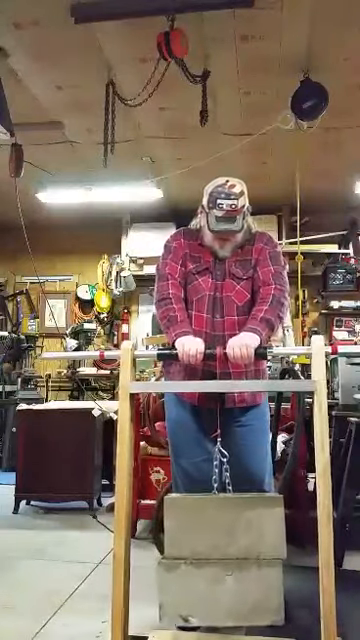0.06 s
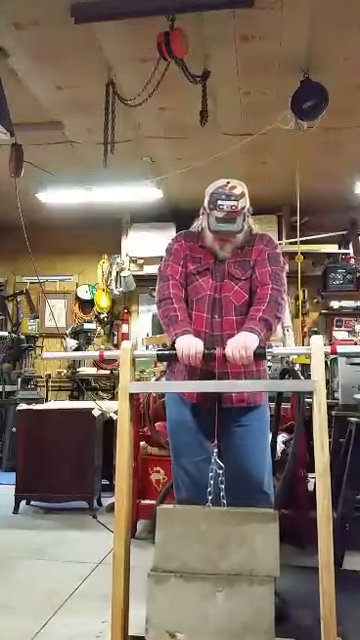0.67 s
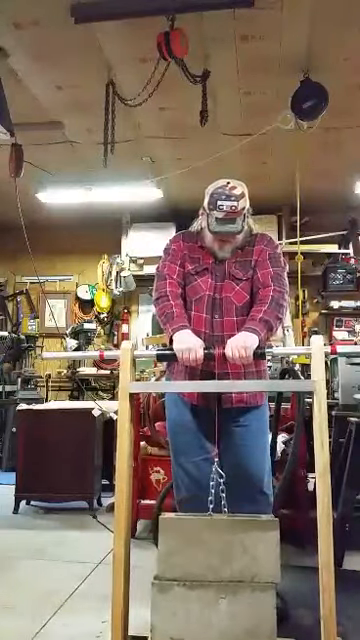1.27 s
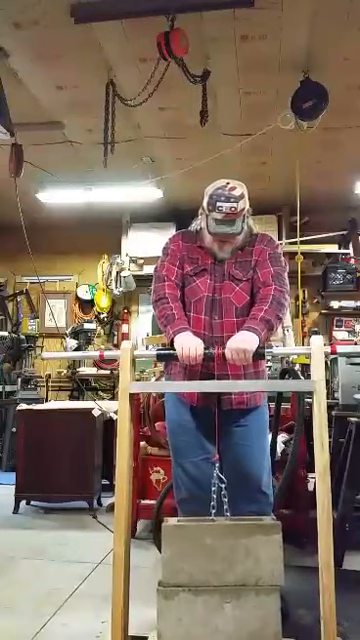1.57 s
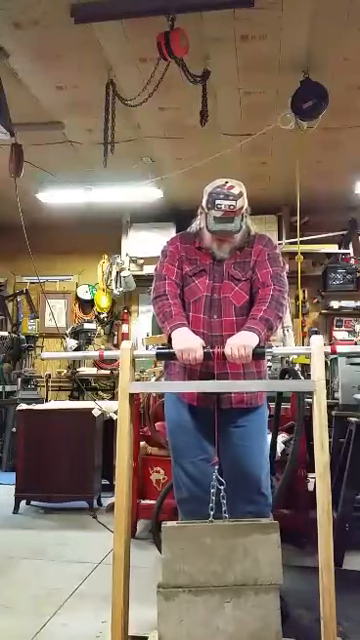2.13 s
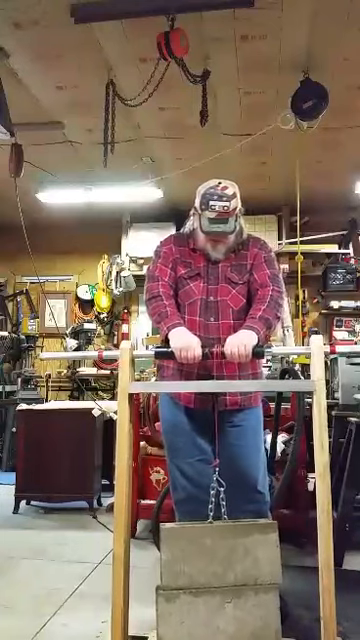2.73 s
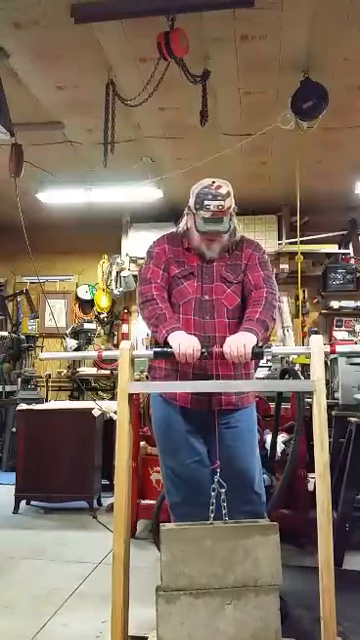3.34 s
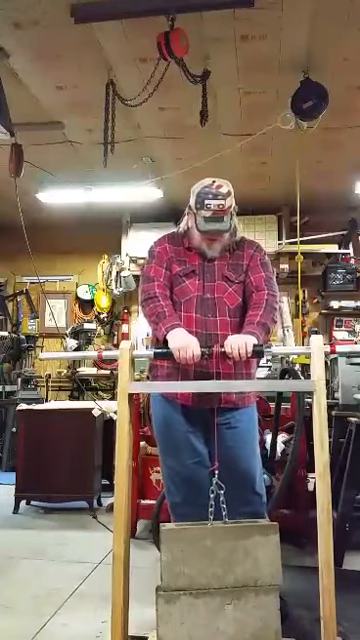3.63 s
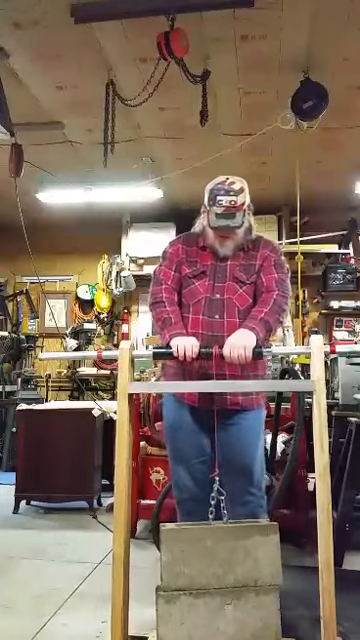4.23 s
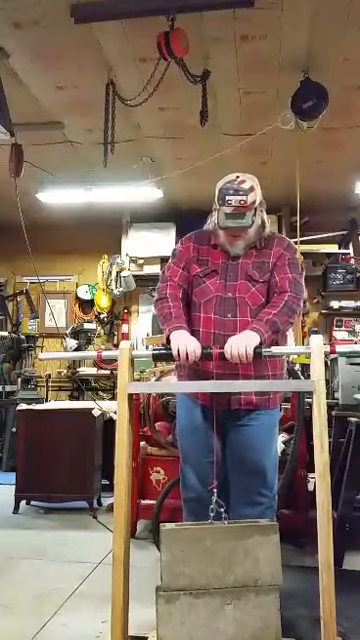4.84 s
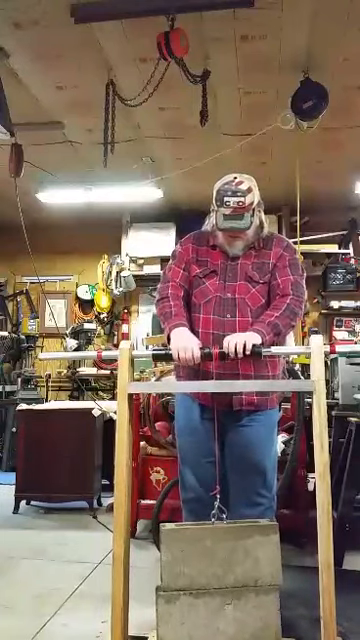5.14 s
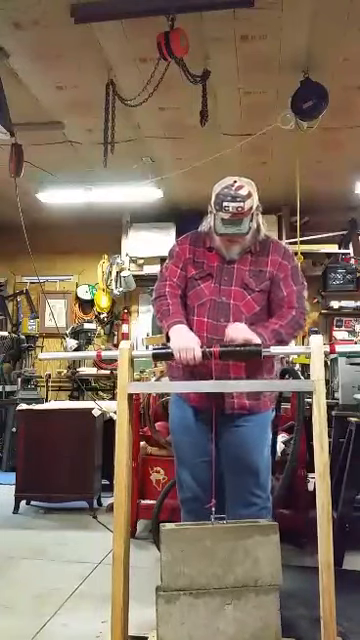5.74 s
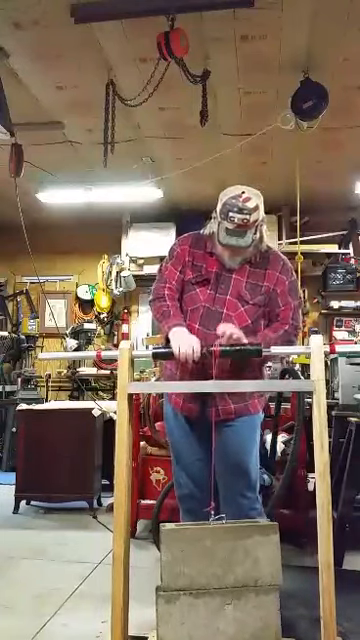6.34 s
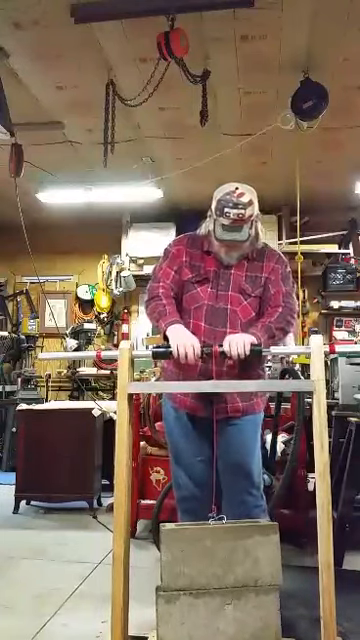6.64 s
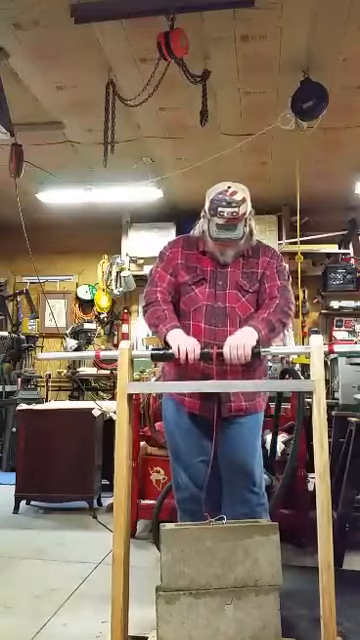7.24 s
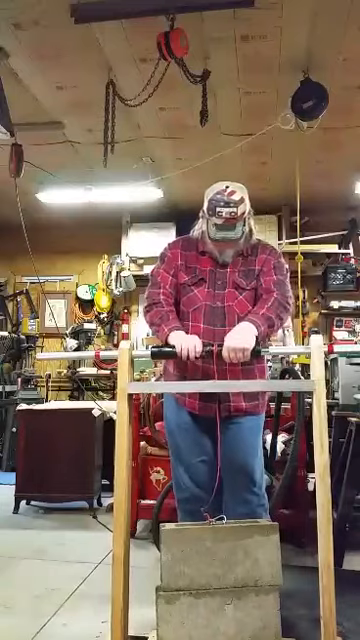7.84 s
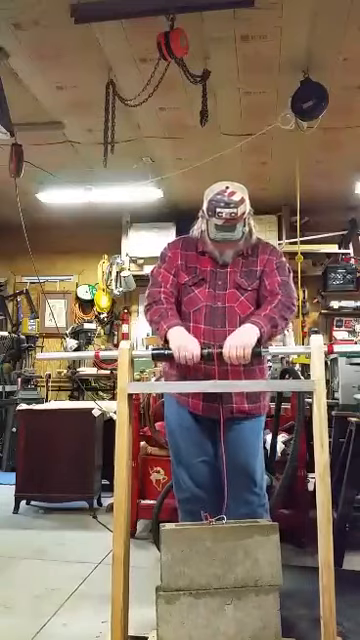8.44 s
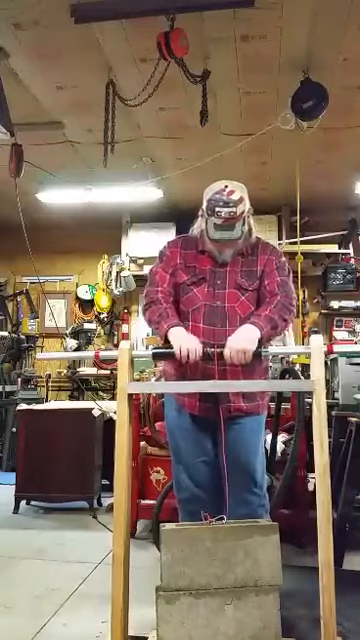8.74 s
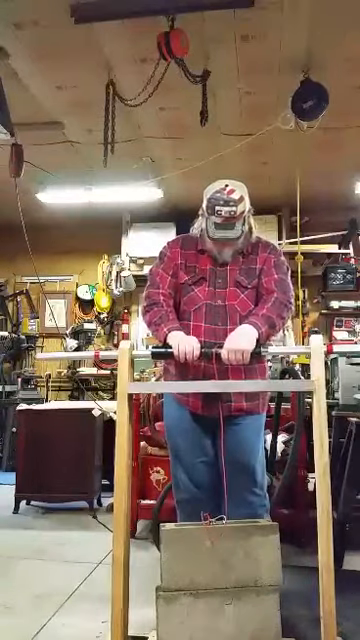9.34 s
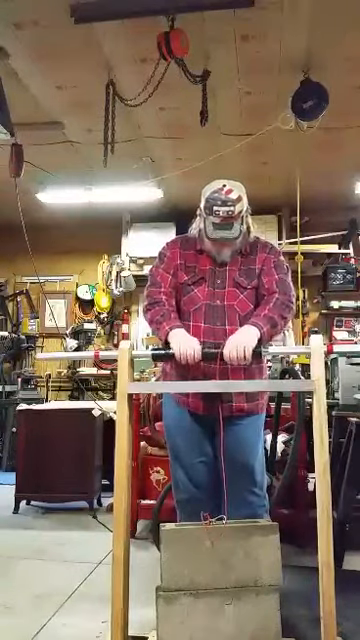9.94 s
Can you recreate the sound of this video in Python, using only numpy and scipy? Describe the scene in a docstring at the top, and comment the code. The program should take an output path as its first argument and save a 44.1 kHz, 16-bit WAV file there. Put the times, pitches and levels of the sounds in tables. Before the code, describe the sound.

A bar twists in short rumbling strokes in wood, a chain clinks, the bar knocks, then slipping cord clicks and thumps the frame.

```python
"""A low wooden rumble and a few judders, close by: a homemade wrist roller turning in a workshop.
Each twist of the steel bar rumbles through the wooden uprights and pays out cord, until the concrete
blocks land with a thump and their chain slackens, clinking. Later the cord slips with a click and the
jerk thumps the frame. Midway the bar slides and clacks in its holes and a palm brushes the grip.
The microphone stands low and close, with the frame a little to its right and the room behind."""
import sys
import numpy as np
from scipy import signal
from scipy.fft import rfft, irfft, next_fast_len
from scipy.io import wavfile
from scipy.ndimage import uniform_filter1d, map_coordinates

SR = 44100
rng = np.random.default_rng(int(sys.argv[2]) if len(sys.argv) > 2 else 0)


def wrap_up_sound(samples):
    """Save the sound to the file named by the first command line argument, as 16-bit audio."""
    columns = np.atleast_2d(samples).T
    # keep every value between -1 and 1, then stretch to whole-number steps
    tamed = np.clip(columns, -1, 1)
    steps = np.round(tamed * 32767).astype(np.int16)
    wavfile.write(sys.argv[1], SR, steps)


N = 441000

# twists of the bar: (time of top speed [s], length [s], rumble level [dB], cord rub level [dB])
TWISTS = [(0.008, 0.15, -59.5, -70.5), (0.354, 0.16, -45, -79), (0.72, 0.2, -46, -73),
          (1.009, 0.16, -45, -68), (1.129, 0.11, -55, -69), (1.47, 0.098, -45.5, -71),
          (1.771, 0.17, -42, -73), (2.388, 0.13, -52, -83), (2.745, 0.63, -51, -64),
          (3.163, 0.2, -57.5, -72), (3.886, .3, -51.5, -62), (4.243, 0.15, -49.5, -56.5),
          (5.252, 0.17, -44, -61.5), (6.497, 0.15, -40.5, -55.5), (6.853, 0.24, -43, -60),
          (7.097, 0.11, -36.5, -59.5), (7.357, 0.14, -37, -59.5), (7.605, 0.15, -40.5, -59),
          (7.863, 0.14, -37.5, -57), (8.117, 0.14, -37.5, -58.5), (8.325, 0.087, -35, -53),
          (8.638, 0.31, -43.5, -57), (9.07, 0.3, -56.5, -71), (9.286, 0.31, -53.5, -65.5),
          (9.573, 0.18, -49, -65), (9.723, 0.15, -53, -73.5), (9.913, 0.14, -55.5, -71.5)]
# spectra of the uprights, the rubbing cord and its fibres: (frequency [Hz], level [dB])
RUMBLE_SPECTRUM = [(60, -48), (125, -6), (160, -5.5), (205, -0.5), (250, 3), (305, 5.5), (365, -5.5),
                   (430, -15.5), (550, -7), (680, -13.5), (840, -13), (1100, -30), (1500, -31.5),
                   (3000, -94.5)]
RUB_SPECTRUM = [(600, -12.5), (1200, 3), (1700, -5), (2500, -0.5), (3400, -7.5), (4300, -7), (5300, -13),
                (6800, -24.5), (7900, -18), (8700, -13.5), (9800, -13), (11200, -25), (12500, -18),
                (15000, -30)]
SWISH_SPECTRUM = [(5000, -59), (7500, -19.5), (8700, 9), (10000, -1.5), (11200, -2.5), (12500, -7.5),
                  (15000, -28)]
SLACK_SWISH_DB = -29  # relative to the rumble
LANDING_S = 1.9  # by then the cord has lost the weight of the blocks

# thumps of the frame: low judders under load, the blocks landing, then cord jerks with a snap:
# (time [s], snap level [dB], boom level [dB], boom pitch [Hz])
THUMPS = [(0.326, -96, -32, 218.1), (0.361, -76, -41, 243), (0.693, -102, -36, 230),
          (1.447, -73, -33.5, 216), (1.765, -64, -13, 319), (1.798, -59, -31.5, 311),
          (2.499, -76, -37.5, 265), (2.972, -64, -30.5, 288), (3.636, -55, -23, 282),
          (3.899, -66, -36.5, 314), (6.455, -60, -35, 314), (7.002, -57.5, -33.5, 265),
          (7.292, -42.5, -40, 289.5), (7.51, -57.5, -38, 282), (7.549, -46, -42, 292),
          (7.733, -57, -57, 270), (7.986, -74, -33.5, 278.4), (8.287, -45, -23.5, 329),
          (8.389, -56.5, -29, 277.6), (8.554, -42, -26.5, 282), (8.658, -48, -22, 292),
          (9.01, -59.5, -33, 292), (9.204, -37.5, -22, 291), (9.417, -66.5, -32, 285),
          (9.516, -67, -36, 277), (9.657, -39, -18.5, 277), (9.916, -82, -39.5, 292)]
# modes of the wooden frame, main bending mode first: (frequency [Hz], level [dB], t60 [s])
FRAME_MODES = [(292, 8.5, 0.068), (196.3, -10, .1), (354, -4.5, 0.098), (583.4, -9, 0.056),
               (784.4, -21.5, 0.094), (145.2, -11.5, 0.062)]
BOOM_LAG_S, BOOM_RISE_S = 0.00333, 0.0052  # the frame answers just after the snap
# spectrum of a bare contact: (frequency [Hz], level [dB])
CONTACT_SPECTRUM = [(300, 0.5), (450, 4.5), (580, -3), (760, 7), (930, -6), (1110, -2.5), (1550, -7.5),
                    (2200, 7.5), (3100, 6), (4100, -5), (4800, -2.5), (7000, -17), (8600, -9.5),
                    (12500, -21), (15500, -28)]
# modes of the wound bar, plucked by the cord: (frequency [Hz], width [Hz], level [dB])
SPOOL_MODES = [(1063, 16, -0.5), (1425.5, 90.1, 8), (2100, 52, -2), (2400, 62, 10), (2790, 26, -5.5),
               (3013, 28, -3.5), (3700, 27, -8), (4167, 58, 9.5)]
# bounds of the body, middle, metal and top registers: (frequency [Hz])
REGISTER_EDGES = [420, 1650, 3500, 7200, 15000]
# colour of a snap at SNAP_TYPICAL_DB, by register: (level [dB])
SNAP_COLOUR = [0, 0.5, -6, -9.5]
SNAP_TYPICAL_DB = -42.5
# harder snaps have less body, by register: (change [dB per dB of snap level])
SNAP_TILT = [-0.21, 0.16, -0.035, -0.022]

# chain links falling over: (time [s], level [dB], brightness [dB], length [s])
CLINKS = [(1.363, -81.5, 22.5, 0.21), (1.807, -46.5, -0.5, 0.057), (1.82, -53, -6.5, 0.063),
          (1.846, -56.5, 8.5, 0.079), (2.317, -57.5, -1, 0.2), (2.381, -47, -1, 0.072),
          (2.401, -46, 1.5, 0.096), (2.579, -50.5, 0, 0.1), (2.673, -55, 0.5, 0.12),
          (2.756, -47.5, -2, 0.043), (2.783, -52, 0.5, 0.14), (2.893, -54.5, -2.5, 0.081),
          (2.925, -59, 1, 0.22), (3.097, -48, -2.5, 0.049), (3.2, -50.5, -4.5, 0.025), (3.708, -58, 5, .11),
          (3.803, -56, 15, 0.039), (4.204, -51.5, 8.5, 0.15), (4.301, -49.5, 5.5, 0.16),
          (4.33, -38.5, 7.5, 0.077), (4.349, -40.5, 3.5, .08), (4.397, -43.5, 8.5, 0.042)]
# modes of the links: (frequency [Hz], width [Hz], level [dB])
LINK_MODES = [(718, 32, -11), (1967, 100, 5.5), (2500, 72, 3.5), (3000, 14, 1), (3165, 23, -5.5),
              (3560, 30, 6.5), (3830, 45, -3), (3930, 16, 0), (4020, 18, 8), (4230, 51, 11),
              (4670, 21, -13)]
# colour of a clink, by register: (level [dB])
CLINK_COLOUR = [1, -1, -5, -15.5]
# brighter clinks trade body for top, by register: (change [dB per dB of brightness])
CLINK_TILT = [-1.17, -0.26, 0.83, 1]

# knocks of the bar: (time [s], thud level [dB], ring level [dB], hard edge level [dB], length [s])
CLACKS = [(4.352, -37, -52, -45, 0.066), (4.642, -46.5, -54.5, -58.5, 0.035),
          (4.903, -48, -62.5, -62, 0.047), (4.952, -46, -56.5, -81, 0.1), (5.231, -57, -57, -55.5, .06),
          (5.274, -37, -38.5, -53, .06), (5.479, -44, -53.5, -50.5, 0.11), (5.528, -37, -44, -39, 0.052),
          (5.732, -31, -33, -47.5, 0.065), (5.788, -37.5, -34.5, -40, 0.11),
          (5.974, -56, -58, -54.5, 0.037), (6.176, -44, -48.5, -51.5, 0.053),
          (6.414, -45.5, -48, -49.5, 0.14)]
# modes of the steel bar on its bearings: (frequency [Hz], width [Hz], level [dB])
BAR_MODES = [(373.4, 66, 3), (585, 70, -0.5), (696, 27, -2.5), (988, 28, -3.5), (1067, 41, -3.5),
             (1237, 60, -6.5), (1427, 59, -9), (1840, 88, -1.5), (1982, 60, -7), (2182, 40, -6.5),
             (2470, 70, -21), (3080, 15, -7), (3483, 58, -13.5), (4260, 67, -18.5)]
# lengthwise pushes of the bar: (time of top speed [s], length [s], level [dB])
PUSHES = [(4.37, 0.3, -51), (4.684, 0.13, -56), (4.936, 0.15, -56.5), (5.275, 0.05, -47),
          (5.561, 0.17, -50.5), (5.862, 0.18, -45.5)]
# strokes of a palm over the grip: (time of top speed [s], length [s], level [dB])
BRUSHES = [(6.543, 0.068, -52.5), (6.701, 0.036, -60.5), (6.831, .14, -53)]
# spectrum of skin on the grip: (frequency [Hz], level [dB])
PALM_SPECTRUM = [(3000, -47), (7000, -15), (8700, -2.5), (10500, -19), (11600, -1.5), (12300, 0),
                 (13600, -6), (14400, -23), (16000, -38)]

# reflections off floor, ceiling and wall: (delay [s], gain [ratio])
ECHOES = [(0.0142, 0.43), (0.0371, 0.27), (.051, .17)]
# decay of the workshop: (frequency [Hz], t60 [s])
ROOM_DECAY = [(150, 0.2), (300, 0.3), (800, 0.23), (3000, 0.44), (6000, 0.51), (12000, 0.51)]
# spectrum of the room tone: (frequency [Hz], level [dB])
AIR_SPECTRUM = [(12, -35.5), (20, -4), (61, 0), (148, -13.5), (185, -13.5), (549, -22.5), (932, -32.5),
                (1630, -40), (1980, -39), (3000, -44), (3750, -44.5), (4430, -35.5), (6360, -60.5),
                (10500, -53.5), (15500, -53.5)]
# likeness of left and right at the microphone: (frequency [Hz], correlation [ratio])
STEREO_LIKENESS = [(100, 0.93), (300, 0.84), (600, 0.83), (1200, 0.24), (10000, 0.23)]
# balance at the microphone: (frequency [Hz], left minus right [dB])
STEREO_BALANCE = [(50, -2), (300, -3.5), (600, -3), (1100, -5), (2200, -6.5), (4000, 1.5), (8000, -1),
                  (13000, -6)]


def turning_bar():
    """Close to the microphone the bar chatters round in the wood; the cord rubs and swishes."""
    s, length, rumble_db, rub_db = np.transpose(TWISTS)
    rumble_gain = strokes(s, length, rumble_db)
    rub_gain = strokes(s, length, rub_db, shape=1.4, end_db=-9.5)
    wood = unit(echoed(coloured(grains(N, rate=700, scatter_db=1.5), RUMBLE_SPECTRUM)))
    cord = unit(echoed(coloured(grains(N, rate=4000, scatter_db=1.5), RUB_SPECTRUM)))
    fibres = unit(coloured(grains(N, rate=2500, scatter_db=2), SWISH_SPECTRUM))
    loaded = np.clip((LANDING_S - np.arange(N) / SR) / .05, 0, 1)
    swish = amp(SLACK_SWISH_DB - 3.9 * loaded) * fibres  # a taut cord swishes less
    return rumble_gain * (wood + swish) + rub_gain * cord


def frame_thumps():
    """The frame booms briefly: it judders under load, takes the blocks' landing, then the cord's jerks."""
    track, t = np.zeros(N), np.arange(SR // 3) / SR
    for s, _, db, pitch_hz in THUMPS:
        scatter_db = 2 * rng.standard_normal(len(FRAME_MODES))
        boom = 0
        for k, (hz, level_db, t60) in enumerate(FRAME_MODES):
            # the main bending mode shifts with the pull of the cord
            hz, level_db = (pitch_hz, level_db) if k == 0 else (hz, level_db + scatter_db[k])
            boom = boom + amp(level_db - 60 * t / t60) * np.sin(2 * np.pi * hz * t)
        boom *= 1 - np.exp(-(t / BOOM_RISE_S) ** 2)
        add(track, s + BOOM_LAG_S, amp(db) * boom / np.abs(boom).max())
    return echoed(np.array([track, track]))


def cord_slips():
    """The cord snaps over its own turns and plucks the bar, barely audible in the early thumps."""
    track = np.zeros((2, N))
    for s, db, _, _ in THUMPS:
        slip = coloured(contact(length=0.069, softness=0.19, rate=14000), CONTACT_SPECTRUM)
        snap = struck_metal(slip, SPOOL_MODES, contact_db=-1, scatter_db=5)
        levels_db = db + np.array(SNAP_COLOUR) + (db - SNAP_TYPICAL_DB) * np.array(SNAP_TILT)
        add(track, s, voiced(snap, levels_db, REGISTER_EDGES))
    return track


def chain_clinks():
    """Links of the slackening chain drop onto each other and the block, some dull, some bright."""
    track = np.zeros((2, N))
    for s, db, bright_db, length in CLINKS:
        hit = coloured(contact(length, softness=0.13, rate=9000), CONTACT_SPECTRUM)
        clink = struck_metal(hit, LINK_MODES, contact_db=-3, scatter_db=3)
        levels_db = db + np.array(CLINK_COLOUR) + bright_db * np.array(CLINK_TILT)
        add(track, s, voiced(clink, levels_db, REGISTER_EDGES))
    return track


def bar_clacks():
    """The bar shunts against the uprights and rings, damped by the hands."""
    track = np.zeros((2, N))
    for s, thud_db, ring_db, edge_db, length in CLACKS:
        knock = steel_bar(contact(length, softness=0.18, rate=11000), contact_db=-12)
        ring = voiced(knock, [thud_db, ring_db, edge_db], edges_hz=[120, 850, 1550, 3800])
        scuff = coloured(contact(length, softness=0.75, rate=9100), CONTACT_SPECTRUM)
        grit = voiced(scuff, [edge_db - 15.5], edges_hz=[5500, 15000])
        add(track, s, ring + grit)
    return track * amp([[-0.5], [0.5]])  # the knocks come from the right upright


def sliding_bar():
    """The bar scrapes unevenly along its holes."""
    scrape = steel_bar(grains(N, rate=4000, scatter_db=1.5), contact_db=-13)
    scrape *= amp(2.36 * wobble(25))
    return unit(scrape) * strokes(*np.transpose(PUSHES), rise=0.44, shape=1.7, end_db=-7.5)


def brushing_palm():
    """Skin on the grip makes a thin, high hiss."""
    hiss = coloured(grains(N, rate=2200, scatter_db=2.5), PALM_SPECTRUM) * amp(wobble(35))
    return unit(hiss) * strokes(*np.transpose(BRUSHES), rise=0.47)


def strokes(s, length, db, rise=0.46, shape=2.15, end_db=-12):
    """Gain of hand movements: each peaks at time s and is end_db down at both ends of its length."""
    t = np.arange(0, N, SR // 1000) / SR
    offset = (t[:, None] - s) / length
    from_peak = np.maximum(-offset / rise, offset / (1 - rise))
    gain = amp(db + end_db * np.minimum(from_peak, 10) ** shape).sum(1)
    return np.interp(np.arange(N) / SR, t, gain)


def grains(n, rate, scatter_db):
    """Stereo stick-slip: tiny impulses of random size, on average rate a second."""
    sizes = (rng.random(n) < rate / SR) * amp(scatter_db * rng.standard_normal(n))
    return unit(spread(sizes * rng.standard_normal((2, n))))


def contact(length, softness, rate):
    """A run of micro-slips dying away over length seconds; short runs crack, long ones build slowly."""
    t = np.arange(SR // 3) / SR
    rise_s = softness * length ** 2
    attack = (1 - np.exp(-t / rise_s)) ** 2
    decay = amp(-60 * (t / length) ** 1.59)
    return grains(len(t), rate, scatter_db=3) * attack * decay


def steel_bar(x, contact_db):
    """x rings the bar; a little of the bare contact stays."""
    ring = filtered(x, lambda hz: resonances(hz, BAR_MODES))
    return ring + amp(contact_db) * coloured(x, CONTACT_SPECTRUM)


def struck_metal(x, modes, contact_db, scatter_db, detune=0.0213):
    """x rings metal modes, their balance and tuning new at each hit; the bare contact stays too."""
    centre, width, db = np.transpose(modes)
    level, shift = rng.standard_normal((2, len(modes)))
    struck = list(zip(centre * np.exp(detune * shift), width, db + scatter_db * level))
    return filtered(x, lambda hz: amp(contact_db) + resonances(hz, struck))


def resonances(hz, modes):
    """Causal response of damped modes, summed with alternating signs."""
    return sum((-1) ** k * amp(db) * 1j * hz * width / (centre ** 2 - hz ** 2 + 1j * hz * width)
               for k, (centre, width, db) in enumerate(modes))


def voiced(x, levels_db, edges_hz):
    """Hard and soft contacts differ in colour: set the loudest 10 ms of each register."""
    out = 0
    for db, band in zip(levels_db, zip(edges_hz, edges_hz[1:])):
        part = signal.sosfilt(signal.butter(3, band, "band", fs=SR, output="sos"), x)
        peak_power = uniform_filter1d(part.mean(0) ** 2, SR // 100).max()
        out = out + amp(db) * part / np.sqrt(peak_power)
    return out


def echoed(x):
    """The direct sound reaches the microphone first, then its reflections off the nearest surfaces."""
    heard = x.copy()
    for delay, gain in ECHOES:
        add(heard, delay, gain * x)
    return heard


def workshop(x, clutter_db=9, clutter_t60=0.054, rise_s=0.0058):
    """Benches and tools scatter a short, dense answer; then each frequency dies at its own speed."""
    noise = spread(rng.standard_normal((2, SR // 2)))
    hz, t, bands = signal.stft(noise, SR, nperseg=256)
    decay = amp(-60 * t / along(ROOM_DECAY, hz)[:, None])
    clutter = amp(clutter_db - 60 * t / clutter_t60)
    tail = signal.istft(bands * (decay + clutter), SR, nperseg=256)[1]
    tail *= 1 - np.exp(-np.arange(tail.shape[1]) / SR / rise_s)
    return signal.fftconvolve(x, tail / np.linalg.norm(tail[0]), axes=1)[:, :N]


def room_tone():
    """The still air of the workshop: a low, steady hush all round the microphone."""
    return unit(coloured(spread(rng.standard_normal((2, N))), AIR_SPECTRUM))


def spread(pair):
    """Two unrelated signals become left and right, alike in the bass."""
    angle = lambda hz: np.arccos(along(STEREO_LIKENESS, hz)) / 2
    mid, side = filtered(pair, lambda hz: np.array([np.cos(angle(hz)), np.sin(angle(hz))]))
    return np.array([mid + side, mid - side])


def coloured(x, spectrum, size=4096):
    """x through a minimum-phase filter with the given spectrum."""
    cepstrum = irfft(np.log(amp(along(spectrum, np.fft.rfftfreq(size, 1 / SR)))))
    cepstrum[1:size // 2] *= 2
    cepstrum[size // 2 + 1:] = 0
    impulse = irfft(np.exp(rfft(cepstrum)))
    return signal.fftconvolve(x, impulse[None], axes=1)[:, :x.shape[1]]


def filtered(x, response):
    """x through a frequency response."""
    n = x.shape[-1]
    padded = next_fast_len(n + 8192)
    return irfft(rfft(x, padded) * response(np.fft.rfftfreq(padded, 1 / SR)), padded)[..., :n]


def wobble(rate):
    """A smooth random curve, rate knots a second."""
    return map_coordinates(rng.standard_normal(int(N * rate / SR) + 4), [np.arange(N) * rate / SR])


def along(points, hz):
    """Interpolate (frequency, value) points on a log axis."""
    knots_hz, values = np.transpose(points)
    return np.interp(np.log(hz + 1), np.log(knots_hz + 1), values)


def add(track, s, sound):
    """Mix a sound in at time s."""
    start = round(s * SR)
    part = sound[..., :N - start]
    track[..., start:start + part.shape[-1]] += part


def amp(db):
    """Decibels to gain."""
    return 10 ** (np.asarray(db) / 20)


def unit(x):
    """Scale to rms 1."""
    return x / np.sqrt(np.mean(x ** 2) + 1e-20)


def scene():
    """The roller up close, a little right of the microphone, with the workshop around it."""
    boom = frame_thumps()
    contacts = cord_slips() + chain_clinks() + bar_clacks()
    friction = turning_bar() + sliding_bar() + brushing_palm()
    room = workshop(amp(-8) * boom + amp(-1) * contacts + amp(-2) * friction)
    mix = boom + contacts + friction + room + amp(-55.5) * room_tone()
    return filtered(mix, lambda hz: amp(np.outer([.5, -.5], along(STEREO_BALANCE, hz))))


def record(dry, top_hz=15650):
    """The microphone's signal is cut off above top_hz."""
    return filtered(dry, lambda hz: hz < top_hz)


dry = scene()
out = record(dry)
wrap_up_sound(out)
```